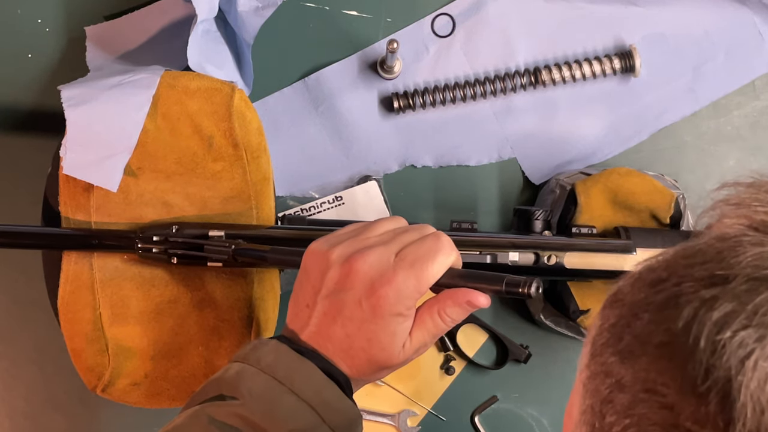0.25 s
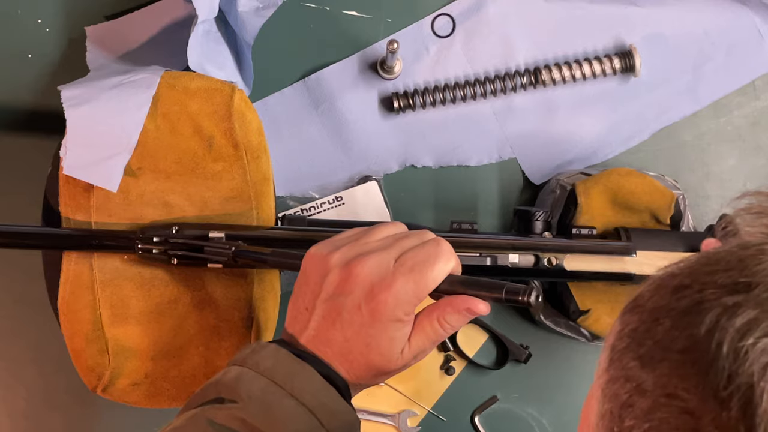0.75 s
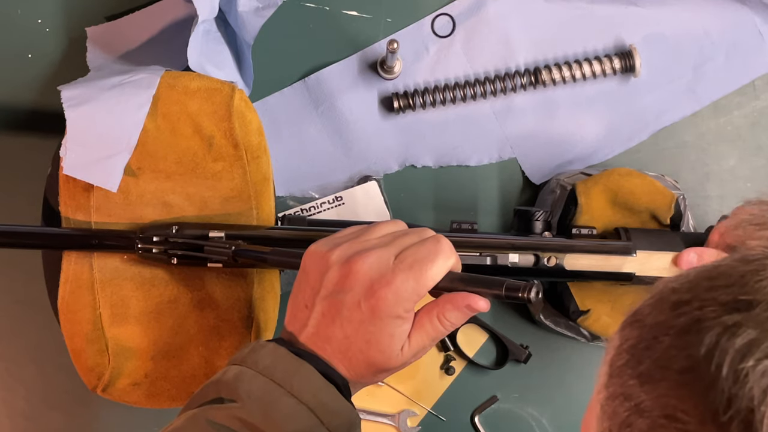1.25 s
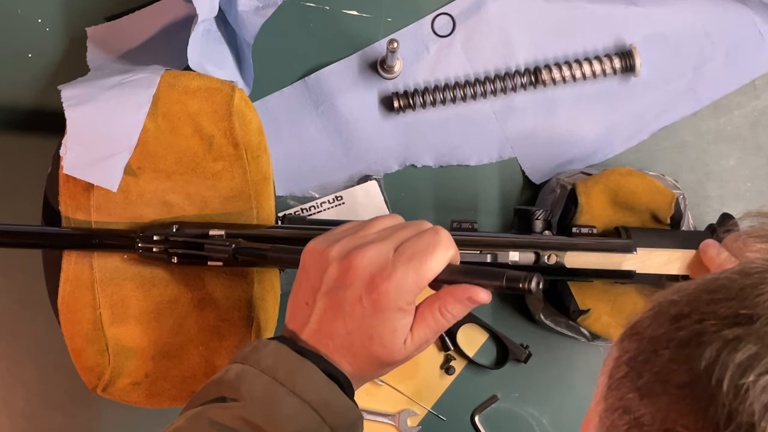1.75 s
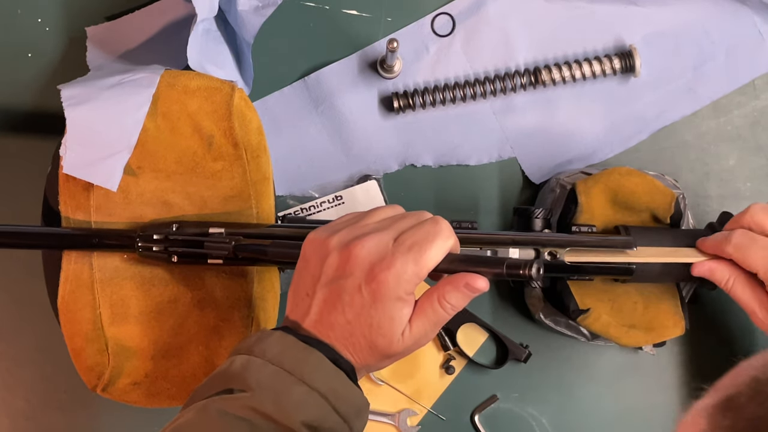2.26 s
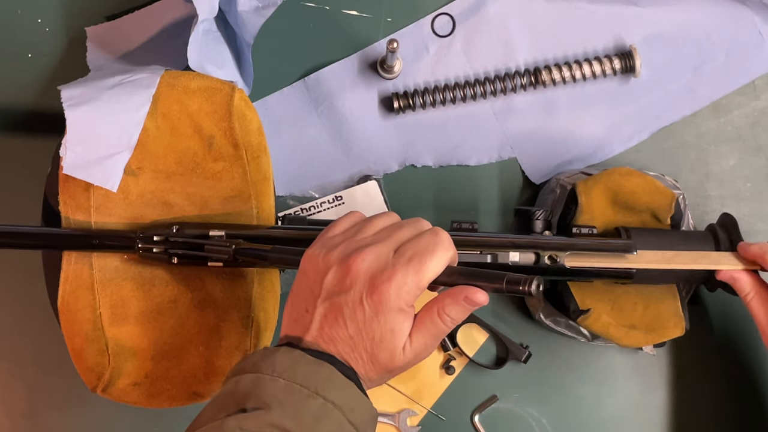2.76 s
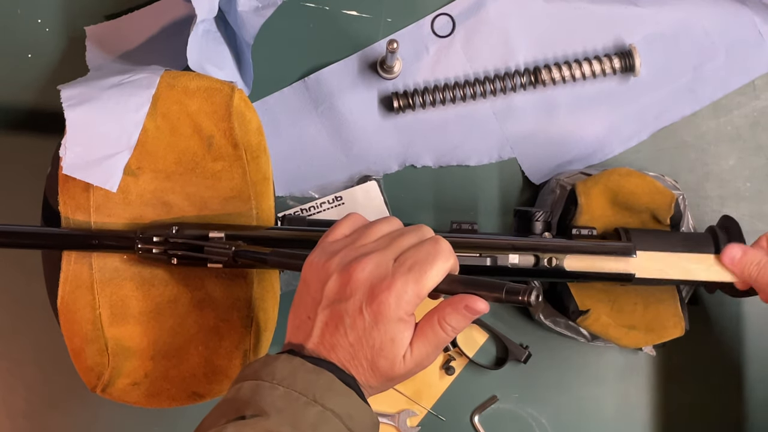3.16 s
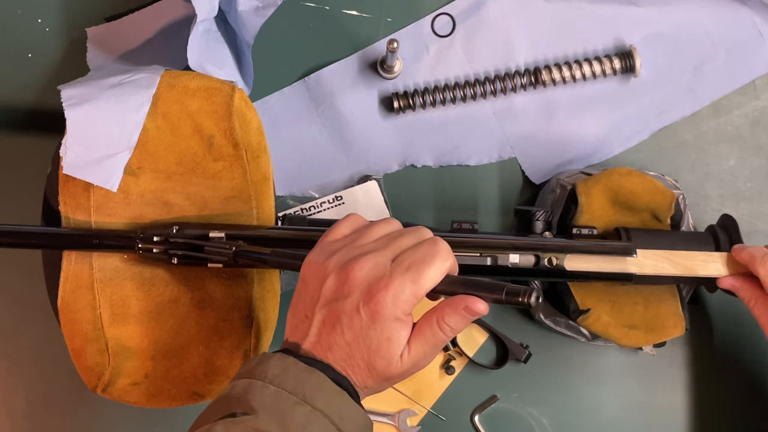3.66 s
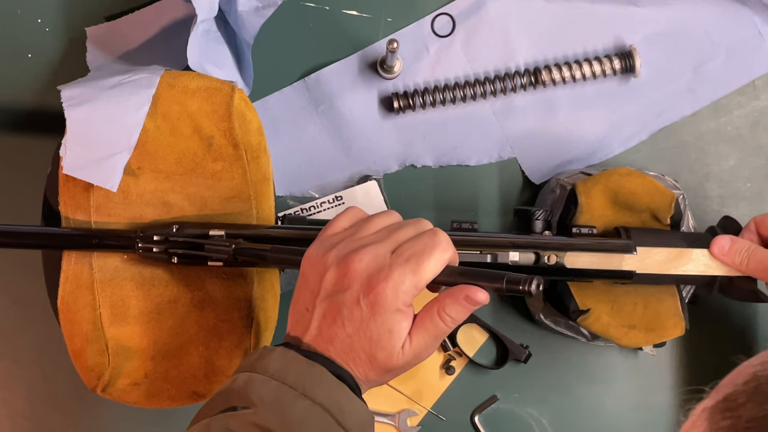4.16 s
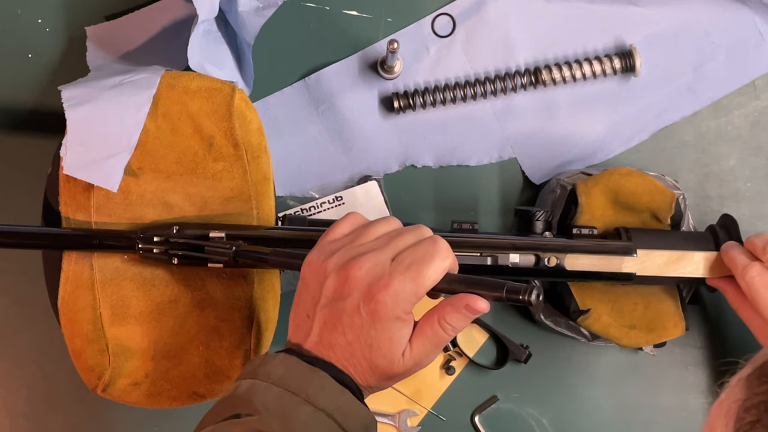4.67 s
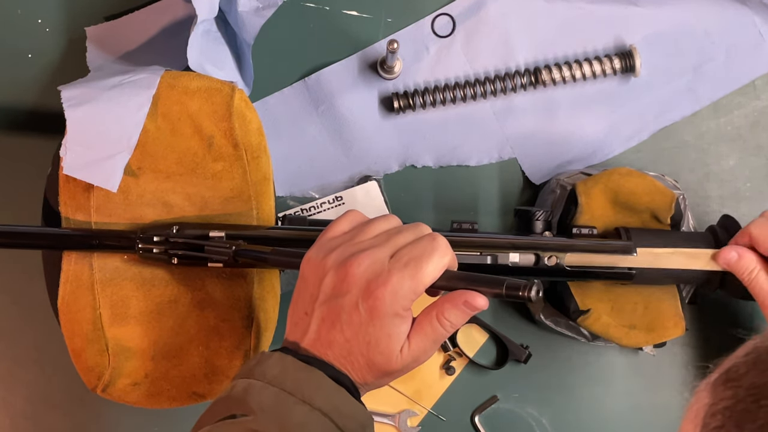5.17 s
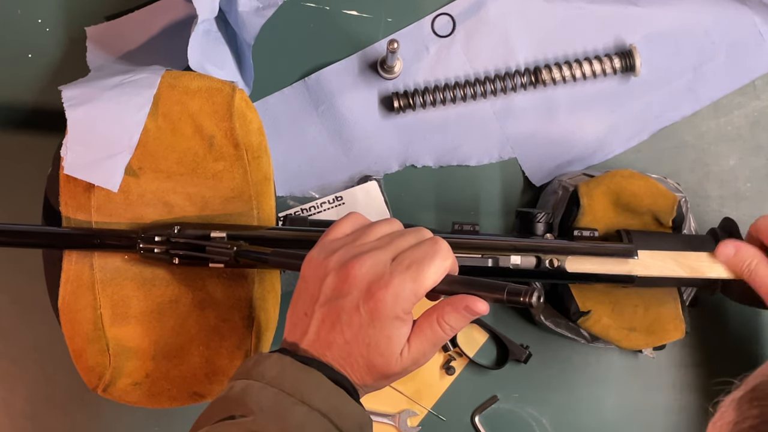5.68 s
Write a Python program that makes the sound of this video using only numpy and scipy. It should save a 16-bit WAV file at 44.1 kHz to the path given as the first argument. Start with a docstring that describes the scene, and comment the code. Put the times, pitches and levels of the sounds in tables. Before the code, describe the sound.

Dry, hollow metallic creaks and snaps in short clusters as tight cloth jerks through a metal cylinder, with near-quiet gaps of faint clinks between.

```python
"""In a small hard room, a cloth-wrapped wooden rod is pushed and twisted inside a steel cylinder on a padded bench.
The tight cloth sticks and slips in sharp snaps, noise bursts that ring the modes of the cylinder. Cloth and
sleeves rustle as grainy noise, the bench rumbles under the hands in wavering modes and filtered noise, and
loose steel parts tinkle faintly as decaying sines. A close pair of microphone ports listens from above."""
import sys
import numpy as np
from scipy import signal
from scipy.fft import rfft, irfft, next_fast_len
from scipy.io import wavfile
from scipy.ndimage import uniform_filter1d, map_coordinates

SR = 44100
rng = np.random.default_rng(int(sys.argv[2]) if len(sys.argv) > 2 else 0)


def log_audio(samples):
    """Write samples as a 16-bit WAV file to the path given in sys.argv[1]."""
    # one column per channel
    frames = np.atleast_2d(samples).T
    # limit to full scale, then quantise
    limited = np.clip(frames, -1, 1)
    pcm = np.round(limited * 32767).astype(np.int16)
    wavfile.write(sys.argv[1], SR, pcm)


def volts_from_decibels(level):
    """Turn decibel levels (scalar or array-like) into linear amplitude factors."""
    exponent = np.asarray(level, float) / 20
    return 10 ** exponent


N = 261072  # samples

# single slips of the cloth plug, a few followed by a strong echo: start_s, level_db, air_cavity_hz
SINGLE_SLIPS = [(0.0695, -22.5, 4350), (0.196, -20.5, 4660), (0.8767, -19.5, 5240), (0.9863, -20, 5100),
                (1.1058, -18, 4670), (1.112, -19.5, 4750), (1.1283, -16, 4700), (1.153, -19.5, 4860),
                (1.1971, -21.5, 4540), (1.2317, -18.5, 4600), (2.0293, -28, 3130), (2.08, -16, 3830),
                (2.1248, -16.5, 5500), (2.134, -26, 5970), (2.1608, -18, 4870), (2.1985, -20.5, 5700),
                (2.2294, -22, 2950), (2.2625, -23, 2840), (3.016, -18, 4600), (3.0341, -23, 5070),
                (3.0887, -18, 4200), (3.1152, -24.5, 4300), (3.7807, -33.5, 3630), (3.799, -20, 3640),
                (3.833, -21, 4160), (3.9366, -18, 4210), (3.966, -15.5, 4150), (3.989, -20.5, 5100),
                (4.0567, -13, 4670), (4.2023, -29.5, 3800), (4.849, -19.5, 5780), (4.958, -12.5, 4650),
                (4.964, -18, 4600), (4.9778, -20.5, 4490), (4.9995, -17.5, 4560), (5.008, -18.5, 5200),
                (5.0572, -19, 4300), (5.3008, -10, 5460), (5.3054, -27.5, 5540), (5.5001, -13, 4230),
                (5.52, -20.5, 4900)]
# judders, slips at a nearly even pace: first_s, last_s, first_db, last_db, air_cavity_hz
JUDDERS = [(0.0015, 0.047, -23, -21.5, 4500), (0.101, 0.1603, -19.5, -27.5, 4660),
           (0.749, 0.8274, -19, -16, 5200), (0.9089, 0.9576, -20, -26, 5150),
           (3.1319, 3.1895, -18, -14.5, 3820), (3.2008, 3.303, -14.5, -25.5, 3750),
           (3.86, 3.906, -24.5, -26, 5450), (4.0054, 4.037, -15, -16, 4550),
           (5.0787, 5.1123, -21, -24, 3980), (5.1503, 5.1844, -23, -21.5, 4450),
           (5.332, 5.363, -20, -22.5, 3920)]
# number of slips in each judder
JUDDER_COUNTS = [4, 4, 3, 3, 5, 11, 3, 3, 3, 4, 3]
# slip colour in each stroke: from_s, knock_db (near 1 kHz), body_db (near 2.3 kHz), edge_db (near 9.5 kHz)
STROKE_COLOURS = [(-.1, -15, -4.5, -14), (.6, -10, 2, -10.5), (.77, -19, -5.5, -18), (.85, -18.5, -6, -10),
                  (1.05, -14.5, -9, -13), (1.18, -11.5, -6.5, -11.5), (1.9, -10, -6.5, -17),
                  (2.1, -10, -4.5, -16), (2.18, -5.5, -11.5, -14.5), (2.9, -4.5, -6.5, -10.5),
                  (3.06, -8, -9.5, -14), (3.1, -13.5, -7.5, -13.5), (3.195, -15, -6.5, -15.5),
                  (3.7, -13.5, -9, -13.5), (3.98, -10.5, -6, -12.5), (4.15, -3, -11, -13),
                  (4.7, -10, -7.5, -15), (4.9, -11, -7.5, -11), (5.03, -7, -8, -13),
                  (5.25, -11.5, -11, -14.5), (5.45, -11.5, -10.5, -14.5)]
# soft taps of the rod between strokes: start_s, level_db, air_cavity_hz, knock_db (near 1 kHz)
ROD_TAPS = [(0.4873, -46.5, 2800, -4), (0.6806, -45, 6500, -10), (2.5934, -52.5, 4330, -26),
            (3.415, -47.5, 3310, -15), (3.5349, -46.5, 3070, -3), (3.686, -50.5, 2910, -10.5),
            (4.2785, -53.5, 2730, 4), (5.7324, -47.5, 3330, -9), (5.7491, -40.5, 3150, -27),
            (5.771, -48.5, 2960, 0.5), (5.8207, -43, 2680, -0.5)]


def contacts():
    """Stick-slip friction: all slips, strong echoes and taps as (s, level dB, cavity Hz, knock, body, edge dB)."""
    scatter_s, scatter_db, colour_scatter_db = 0.0006, 1.1, 2.5
    fade_power = 2.3  # the level of a judder changes late
    tap_body_db, tap_edge_db = 0, -15.5
    slips = list(SINGLE_SLIPS)
    for (first, last, first_db, last_db, cavity_hz), count in zip(JUDDERS, JUDDER_COUNTS):
        progress = np.linspace(0, 1, count)
        shift, louder = rng.standard_normal((2, count))
        times = np.abs(first + (last - first) * progress + scatter_s * shift)
        levels = first_db + (last_db - first_db) * progress ** fade_power + scatter_db * louder
        slips += zip(times, levels, np.full(count, cavity_hz))
    slips, strokes = np.array(slips), np.array(STROKE_COLOURS)
    stroke = np.searchsorted(strokes[:, 0], slips[:, 0]) - 1
    colour = strokes[stroke, 1:] + rng.normal(0, colour_scatter_db, (len(slips), 3))
    taps = [(*tap, tap_body_db, tap_edge_db) for tap in ROD_TAPS]
    return np.vstack([np.hstack([slips, colour]), taps])


# colour common to all snaps and taps: frequency_hz, level_db
SNAP_COLOUR = [(150, -35.5), (450, -15.5), (750, -9), (1000, -14.5), (1300, -13.5), (1550, -20.5),
               (1900, -10), (2400, -14), (3100, -19), (4500, -18), (6600, -19.5), (7000, -14),
               (9500, -16.5), (12500, -17.5), (14500, -47.5)]
# resonances of the steel cylinder: mode_hz, width_hz, level_db
CYLINDER_MODES = [(1046, 64, 7), (1190, 190, 0), (1270, 10, -2.5), (1320, 8.3, 5), (1878, 48, 0),
                  (2750, 240, -7.5), (3620, 41, -4.5), (4220, 30, -4), (4364, 56, -5.5), (4740, 7.7, 2.5),
                  (4900, 280, -13), (5783, 32, 3)]


def resonance(f, centre_hz, width_hz):
    """Damped resonator: the complex response of one mode, 1 at its centre."""
    return 1j * f * width_hz / (centre_hz ** 2 - f * f + 1j * f * width_hz)


def snaps():
    """Impulsive excitation of modes: each burst of a few ms rings cylinder and air cavity at new strengths."""
    s, db, cavity_hz, knock_db, body_db, edge_db = contacts().T
    size = 4096
    t, f = np.arange(size) / SR, np.fft.rfftfreq(size, 1 / SR)
    envelope = (1 - np.exp(-t / 0.00067)) * volts_from_decibels(-60 * t / 0.0072)  # rise time and t60 in s
    burst = rfft(rng.standard_normal((len(s), size)) * envelope)
    # a slip drives all bands alike, so the chance tilt of each burst is taken out
    power = np.abs(uniform_filter1d(np.abs(burst) ** 2, size=70))
    uneven_db = 10 * np.log10(power / size + 1e-12)
    colour = [along([(1000, knock), (2300, body), (3400, 0.007), (6600, 0.001), (7100, edge)], f)
              for knock, body, edge in zip(knock_db, body_db, edge_db)]
    strength = volts_from_decibels(rng.normal(0, 0.98, (len(s), len(CYLINDER_MODES))))
    modes = np.array([volts_from_decibels(g) * resonance(f, hz, width) for hz, width, g in CYLINDER_MODES])
    cavity = volts_from_decibels(1.5) * resonance(f, cavity_hz[:, None], 700)  # air trapped beside the plug
    shape = causal(colour + along(SNAP_COLOUR, f) - uneven_db)
    shape = shape * (1 + strength @ modes) * (1 + cavity)
    return heard(irfft(burst * shape) * volts_from_decibels(db)[:, None], s, wet_db=-2.0)


# frequency weighting of the rustle: frequency_hz, density_db (per Hz)
RUSTLE_COLOUR = [(200, -7.5), (600, -8), (1400, -14), (1800, -15), (2030, -7.5), (2300, -11.5), (4200, -13),
                 (6400, -15.5), (7000, -26.5), (11000, -23.5), (13500, -47.5)]
# the cloth rubs along under and between the snaps: from_s, to_s, level_db
CLOTH_RUBS = [(-.05, .12, -41.5), (.89, .97, -41.5), (2.17, 2.2, -48), (3.17, 3.3, -42.5), (3.93, 4.0, -48),
              (5.0, 5.01, -46.5), (5.17, 5.2, -47.5)]
# faint rustle of sleeves and paper throughout: time_s, level_db
SLEEVES = [(0, -58), (.48, -67.5), (.74, -72.5), (1.32, -64.5), (1.55, -81.5), (1.78, -73.5), (2.09, -78),
           (2.36, -69), (3.05, -70.5), (3.53, -71.5), (3.7, -78.5), (4.29, -68), (4.71, -84), (4.9, -77),
           (5.43, -65), (5.52, -60.5), (5.8, -68), (5.92, -74.5)]


def rustle():
    """Friction noise: fibres on steel and sleeves on paper make grainy, patchy noise, unalike in two paths."""
    z = signal.stft(rng.standard_normal((2, N)), nperseg=512)[2]
    field = uniform_filter1d(rng.standard_normal(z.shape[1:]), size=8, axis=0)
    field = uniform_filter1d(field, size=10, axis=1)
    patchy = signal.istft(z * volts_from_decibels(2.0 * field / field.std()), nperseg=512)[1][:, :N]
    grain = patchy * volts_from_decibels(1.2 * wobble(400) + 1.8 * wobble(30))
    coloured = unit(filtered(grain, lambda hz: volts_from_decibels(along(RUSTLE_COLOUR, hz))))
    level = volts_from_decibels(curve(SLEEVES)) + swells(CLOTH_RUBS, rise=230, fall=165)
    return level * coloured


# modes of the bench, lowest first: mode_hz, level_db
BENCH_MODES = [(69, 0), (97, -4.5), (137, -8.5), (202, -9)]
# the hands push on the bench: from_s, to_s, level_db
PUSHES = [(-.05, .18, -41), (.8, .82, -41), (.95, 1.02, -38), (1.14, 1.16, -35), (1.74, 1.76, -58),
          (2.14, 2.2, -41.5), (2.27, 2.29, -49), (2.51, 2.53, -60), (3.06, 3.3, -41), (3.58, 3.6, -55),
          (3.86, 4.05, -41), (4.87, 4.89, -53), (4.98, 5.0, -38.5), (5.05, 5.38, -46.5), (5.51, 5.57, -48),
          (5.79, 5.81, -61.5)]
# the bench rocks in its lowest mode: from_s, to_s, level_db
ROCKS = [(.18, .23, -46), (.52, .54, -65.5), (.66, .68, -54), (.8, .82, -48), (.93, .95, -42.5),
         (1.02, 1.18, -40), (1.36, 1.5, -58), (1.82, 1.84, -54), (2.22, 2.27, -39.5), (2.36, 2.4, -61),
         (2.51, 2.53, -57.5), (3.1, 3.28, -59), (3.39, 3.42, -49), (3.59, 3.66, -56), (3.9, 4.13, -40),
         (4.92, 4.94, -56), (5.04, 5.38, -45.5), (5.56, 5.62, -42.5), (5.79, 5.81, -58)]
# frequency weighting of the rumble under a push: frequency_hz, density_db (per Hz)
RUMBLE_COLOUR = [(15, -25), (35, 5.5), (60, -2), (200, -5.5), (310, -14), (450, -18.5), (650, -52.5)]
# frequency weighting of the murmur under resting hands: frequency_hz, density_db (per Hz)
MURMUR_COLOUR = [(20, -27), (45, -3), (70, -0.5), (110, -5), (170, -16), (330, -17.5), (450, -29.5),
                 (650, -58)]
# level of the murmur before its lumps: time_s, level_db
RESTING = [(0, -60), (.5, -60.5), (.62, -57.5), (1.4, -59), (1.68, -72), (2.0, -63.5), (2.45, -72),
           (3.0, -63), (3.7, -62.5), (4.3, -61.5), (4.8, -69.5), (5.7, -68), (5.92, -66.5)]


def bench():
    """Forced vibration: pushes drive wavering modes and a dull rumble, over a lumpy murmur throughout."""
    t = np.arange(N) / SR
    sway = [volts_from_decibels(db + 3.8 * wobble(22)) * np.sin(2 * np.pi * hz * t + 1.35 * wobble(13))
            for hz, db in BENCH_MODES]
    rumble, murmur = (unit(filtered(rng.standard_normal((2, N)), lambda hz: volts_from_decibels(along(colour, hz))))
                      for colour in (RUMBLE_COLOUR, MURMUR_COLOUR))
    rocked = swells(ROCKS, rise=480, fall=220) * sway[0]
    pushed = swells(PUSHES, rise=320, fall=158) * (sum(sway[1:]) + 0.72 * rumble)
    resting = volts_from_decibels(curve(RESTING) + 4.5 * wobble(14)) * murmur  # lumps: dB, knots per s
    return rocked + pushed + resting


# loose parts touched: start_s, level_db, second_part_share (0-1)
TINKLES = [(1.478, -64.5, 0.02), (1.524, -60.5, 0.8), (2.475, -63, 0.08), (3.415, -59.5, 0.82),
           (3.465, -54.5, 0.23), (3.535, -69.5, 0.4), (3.715, -54.5, 0.75), (4.31, -55, 0.6),
           (4.381, -58, 0.33), (4.462, -59, 0.25), (4.503, -60.5, 0.4), (4.565, -56.5, .7),
           (4.593, -58.5, 0.4), (4.68, -68.5, 0.3), (4.71, -68, 0.5)]
# modes of the two loose parts: mode_hz, level_db, t60_s, part (0 or 1)
PART_MODES = [(3020, -3, .1, 0), (4310, -7, .08, 0), (5760, 0, .13, 0), (7380, -14, .08, 0),
              (3330, 0, .12, 1)]


def tinkles():
    """Free vibration: two nudged steel parts ring in decaying modes, their pitch blurred by chatter."""
    s, db, share = np.transpose(TINKLES)
    share, t = np.clip(share, 0, 1), np.arange(SR // 8) / SR
    chatter = 0.16 * np.cumsum(rng.standard_normal((len(s), len(t))), axis=1)  # phase, rad
    ring = np.zeros(chatter.shape)
    for hz, mode_db, t60, part in PART_MODES:
        part_gain = np.where(part > 0.5, share, 1 - share)[:, None]
        ring += part_gain * volts_from_decibels(mode_db - 60 * t / t60) * np.sin(2 * np.pi * hz * t + chatter)
    ring *= 1 - np.exp(-t / 0.0017)
    tick = uniform_filter1d(rng.standard_normal(ring.shape), size=4) * 0.33 * volts_from_decibels(-60 * t / 0.013)
    return heard((ring + tick) * volts_from_decibels(db)[:, None], s, wet_db=-10.0)


# reverberation time of the room: frequency_hz, t60_s
ROOM_DECAY = [(150, 0.49), (800, 0.14), (1100, 0.29), (1500, 0.18), (5000, 0.26), (12000, 0.21)]
# early echoes from the walls: delay_s, level_db (against the direct sound)
WALL_ECHOES = [(.0028, -19.5), (.0068, -10), (.0085, -32), (0.0097, -11), (0.019, -26)]


def heard(sounds, times, wet_db):
    """Room response: each sound gets echoes and a decaying diffuse tail, along two unrelated paths."""
    count, size = len(times), 1 << 14
    hz, t, z = signal.stft(rng.standard_normal((count, 2, size)), SR, nperseg=256)
    decay = volts_from_decibels(-60 * t / along(ROOM_DECAY, hz)[:, None])
    tail = signal.istft(z * decay, SR, nperseg=256)[1][..., :size]
    tail *= 1 - np.exp(-(np.arange(size) / SR / 0.002) ** 2)  # the room needs a few ms to answer
    tail *= volts_from_decibels(wet_db) / np.linalg.norm(tail, axis=-1, keepdims=True)
    for s, db in WALL_ECHOES:
        tail[..., round(s * SR)] += volts_from_decibels(db + rng.normal(0, 0.51, (count, 2)))
    tail[..., 0] = 1  # the direct sound
    wet = signal.fftconvolve(sounds[:, None], tail, axes=2)
    out = np.zeros((2, N + wet.shape[2]))
    for s, both in zip(times, wet):
        out[:, round(s * SR):][:, :wet.shape[2]] += both
    return out[:, :N]


def unit(x):
    """Normalisation to an rms of 1."""
    return x / np.sqrt(np.mean(x ** 2, axis=-1, keepdims=True) + 1e-20)


def along(points, hz):
    """Interpolation on a log frequency axis of (Hz, value, ..) points, one row per value."""
    f, *cols = np.transpose(points)
    return np.squeeze([np.interp(np.log(hz + 1), np.log(f + 1), c) for c in cols])


def curve(rows):
    """Linear interpolation in time: one value per sample for each column after the time."""
    s, *cols = np.transpose(rows)
    return np.squeeze([np.interp(np.arange(N) / SR, s, c) for c in cols])


def swells(rows, rise, fall):
    """Exponential growth and decay: gain of (from s, to s, dB) holds, rise and fall in dB per s."""
    t = np.arange(N) / SR
    return sum(volts_from_decibels(db - rise * np.maximum(start - t, 0) - fall * np.maximum(t - end, 0))
               for start, end, db in rows)


def wobble(rate):
    """Band-limited random modulation: a smooth curve through rate random knots a second."""
    return map_coordinates(rng.standard_normal(int(N * rate / SR) + 4), [np.arange(N) * rate / SR])


def filtered(x, response):
    """Linear filtering: the spectrum of x times a complex response of frequency."""
    m = next_fast_len(N + SR // 4)
    return irfft(rfft(x, m) * response(np.fft.rfftfreq(m, 1 / SR)), m)[..., :N]


def causal(db):
    """Minimum phase: folding the cepstrum gives the causal response with these levels."""
    cepstrum = irfft(db * np.log(10) / 20)
    half = cepstrum.shape[-1] // 2
    cepstrum[..., 1:half] *= 2
    cepstrum[..., half + 1:] = 0
    return np.exp(rfft(cepstrum))


# side against mid of the port pair: frequency_hz, level_db, share_alike (0-1), turn_rad
PORT_SPREAD = [(60, -32.5, 0, 9), (550, -9.5, .2, 1), (1100, -7, .25, 2.6), (1550, 1.5, .3, 1),
               (2440, -18, .1, 6), (3100, -12.5, .45, 0), (4000, -28, 0.14, 10), (6100, -32.5, 0.3, -4),
               (6730, 5.5, .85, 3), (7400, 11.5, .85, 0.9), (8600, 4, .8, 1.84), (10200, -6.5, .6, 1.5),
               (10800, -17, 0, -7.5), (11300, -15, 0.06, -10.5), (11900, -15, .55, -1.2),
               (13000, 6, .6, -1.5)]


def scene():
    """Interchannel coherence: side is partly the phase-turned mid, partly sound from another path."""
    mid, other = snaps() + tinkles() + rustle() + bench()

    def ports(hz):
        """Partial coherence: responses for the alike and the unrelated part of the side."""
        db, share, turn = along(PORT_SPREAD, hz)
        share = np.clip(share, 0, 1)
        return volts_from_decibels(db) * np.array([np.sqrt(share) * np.exp(1j * turn), np.sqrt(1 - share)])

    late = np.roll(other, 40)  # samples
    side = filtered(np.array([mid, late]), ports).sum(axis=0)
    return np.array([mid + side, mid - side])


def low_pass(x):
    """Removes everything above the highest recorded frequency."""
    return signal.sosfilt(signal.butter(12, 13510, fs=SR, output="sos"), x)


def record(dry):
    """High-pass response: the microphone drops the deepest bass, steeply below about 42 Hz."""
    mix = filtered(dry, lambda hz: 1 / (1 + (42 / (hz + 1)) ** 6))
    return low_pass(mix)


dry = scene()
out = record(dry)
log_audio(out)
```